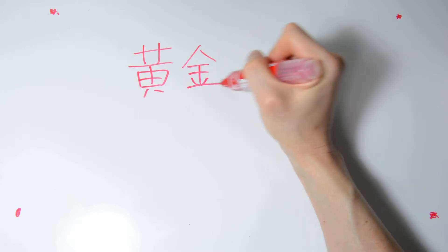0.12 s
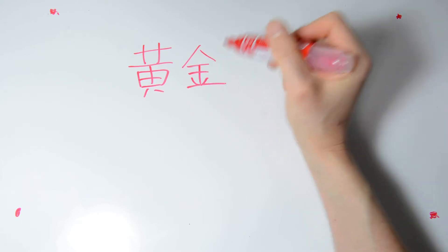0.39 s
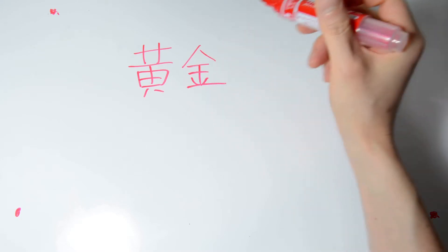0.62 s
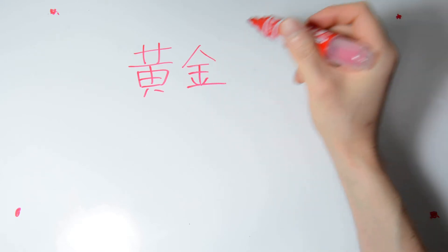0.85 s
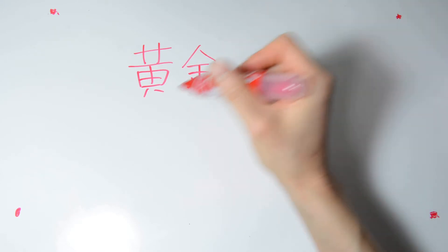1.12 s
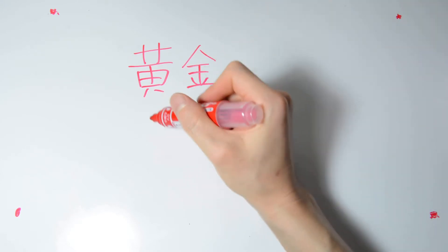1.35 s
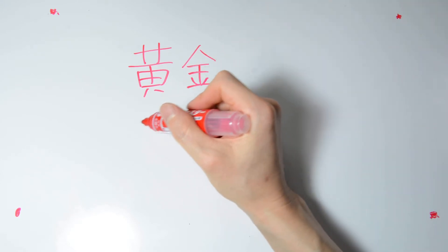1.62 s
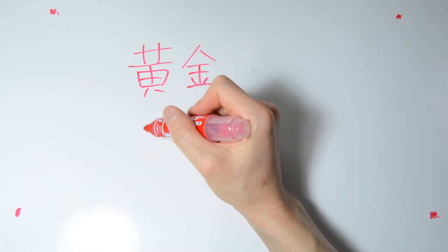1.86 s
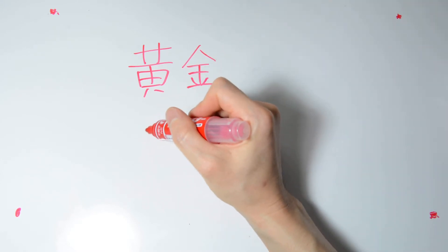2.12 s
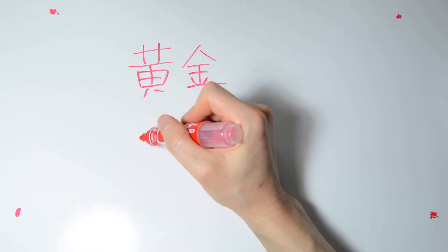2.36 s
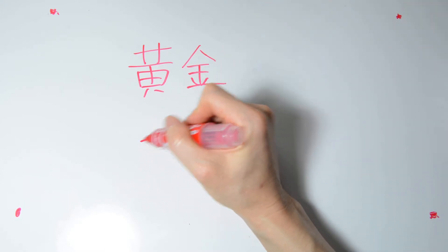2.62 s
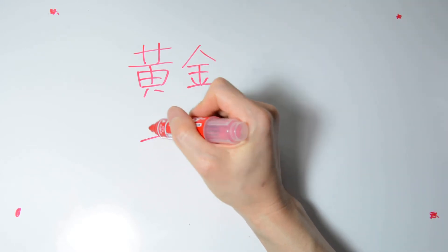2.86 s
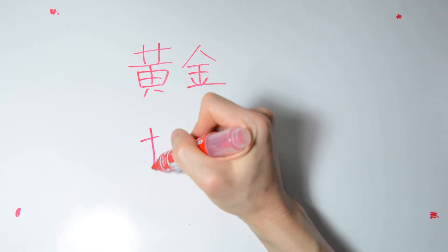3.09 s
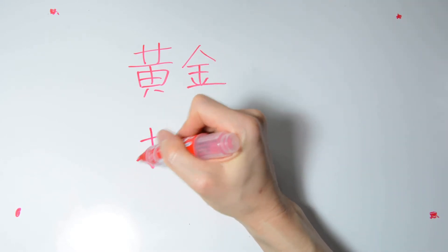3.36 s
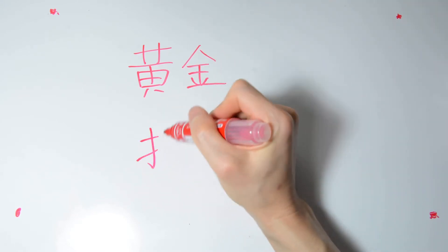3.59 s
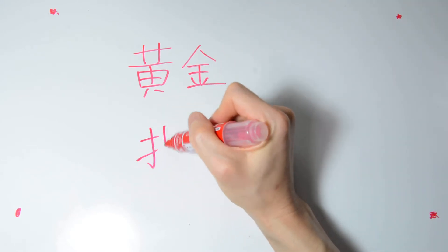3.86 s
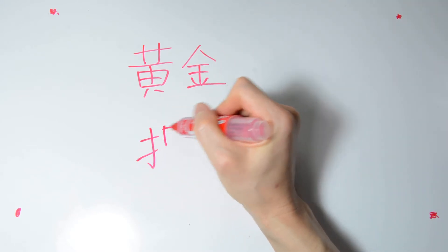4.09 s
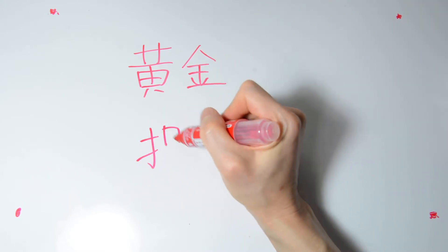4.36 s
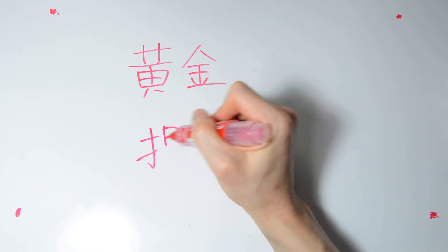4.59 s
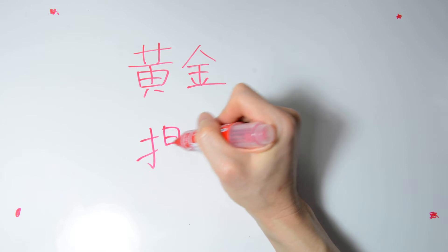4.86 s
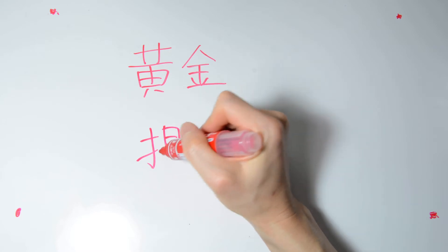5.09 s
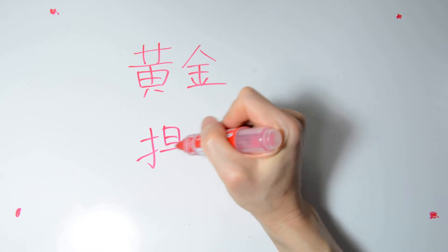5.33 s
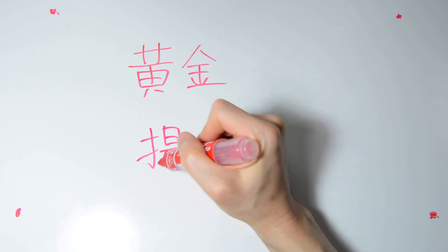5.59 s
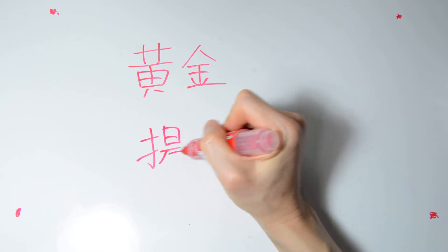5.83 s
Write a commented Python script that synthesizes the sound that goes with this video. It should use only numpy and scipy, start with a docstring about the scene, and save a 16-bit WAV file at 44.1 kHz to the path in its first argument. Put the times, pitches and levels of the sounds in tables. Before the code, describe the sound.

A felt pen finishes a stroke, the hand bumps the board with a stiff rap and heavy low thump, then lifts away, leaving motor and fan hum, mains buzz and soft room noise. After another muffled thump, writing resumes: boomy nib touches several times a second, slight rattles and thin dry hisses, heard closely in stereo indoors.

```python
"""A dull knock, then the soft hiss of a felt marker writing on a large thin whiteboard in a quiet room.
Two close microphone ports hear it. Each hard knock or soft thump sends a bending wave through the board,
treble first and bass last, and its resonances ring. Hard knocks rattle, and strokes add faint hiss and rumble.
One sharp rap and a few dry pen ticks stand out; behind lie hums of a motor and a fan, a mains buzz and room noise."""
import sys
import numpy as np
from scipy import signal
from scipy.fft import rfft, irfft, next_fast_len
from scipy.io import wavfile
from scipy.ndimage import uniform_filter1d

SR = 44100
rng = np.random.default_rng(int(sys.argv[2]) if len(sys.argv) > 2 else 0)


def wav_out(sig):
    """Save sig, one row per channel (or a flat mono array), as 16-bit PCM at SR to the path in sys.argv[1]."""
    wavfile.write(sys.argv[1], SR, np.round(np.clip(np.atleast_2d(sig).T, -1, 1) * 32767).astype(np.int16))


def ratio_of_db(decibels):
    """Turn decibels (scalar or array-like) into linear amplitude factors; 0 dB maps to 1."""
    return 10 ** (np.asarray(decibels, float) / 20)


N = 262836  # length [samples]

# color of the room noise: (frequency [Hz], relative level per Hz [dB])
ROOM_SPECTRUM = [(18, -53), (30, -3.5), (86, -18.5), (135, -9.5), (262, -7.5), (322, -4.5), (414, -9),
                 (624, -10.5), (1030, -13.5), (1260, -9.5), (1450, -14.5), (1950, -14.5), (2340, -20.5),
                 (3080, -23), (7000, -36), (9100, -65), (15400, -120)]
# likeness of the room noise at the two ports: (frequency [Hz], likeness [-1 to 1])
ROOM_LIKENESS = [(60, 0.77), (130, 1), (290, 0.15), (640, 0.86), (1410, 0.77), (3100, 0.68), (6820, 0.37),
                 (15000, 0.02)]
# balance of the room noise: (frequency [Hz], left over right [dB])
ROOM_BALANCE = [(60, 1), (240, -0.5), (950, 2), (3770, 0.5), (15000, 0)]
# color of the microphones' own hiss: (frequency [Hz], relative level per Hz [dB])
MIC_SPECTRUM = [(2000, -12), (5000, -3), (10000, -2), (16000, -5)]
# tones of the motor, as multiples of its base pitch: (multiple)
MOTOR_MULTIPLES = [1, 2, 3, 4, 5, 6, 10, 13, 15, 16, 18]
# level of each motor tone: (left level [dB], right level [dB], lead of the right port [radians])
MOTOR_LEVELS = [(-52.5, -59.5, 0.94), (-64, -64.5, -1.7), (-65, -76, -1.9), (-60, -58, -0.35),
                (-66.5, -67, 0.069), (-66.5, -65, -0.15), (-93, -94, -0.76), (-80, -84, 0.067),
                (-80.5, -87, -0.5), (-84, -82, -0.23), (-96, -96, .8)]
# tones of the mains buzz, as multiples of its base pitch: (multiple)
BUZZ_MULTIPLES = [3, 5, 6, 7, 8, 11, 18, 20, 21, 28, 29, 30, 31, 32, 33, 34, 40]
# level of each buzz tone: (left level [dB], right level [dB], lead of the right port [radians])
BUZZ_LEVELS = [(-92, -101, -5), (-91, -62.5, -2), (-63.5, -74, -1.05), (-76.5, -89, 0), (-72, -66, -0.3),
               (-82, -70.5, 0), (-79, -84, -0.6), (-78, -81.5, -0.5), (-79, -85, 3), (-86, -81, -2),
               (-77, -71, 1.5), (-74, -73, 1), (-72.5, -77.5, 1.06), (-74.5, -75.5, 0), (-84, -77, 0),
               (-82, -76.5, 2.5), (-80, -78.5, 1.5)]
# tones of the fan, as multiples of its base pitch: (multiple)
FAN_MULTIPLES = [1, 1.6]
# level of each fan tone: (left level [dB], right level [dB], lead of the right port [radians])
FAN_LEVELS = [(-62.5, -64, -0.91), (-63, -68.5, 1.3)]
# ticks of the pen barrel: (time [s], level [dB], pitch [Hz])
PEN_TICKS = [(0.563, -42.5, 4530), (3.258, -51.5, 6950), (3.788, -51, 4540)]
# strokes of the nib: (middle [s], length [s], level [dB])
STROKES = [(0.095, 0.24, -63), (0.267, 0.043, -61.5), (.52, 0.15, -66.5), (2.688, 0.22, -66),
           (3.01, 0.09, -61), (3.085, 0.16, -63.5), (3.395, 0.054, -65), (3.472, 0.2, -67),
           (3.82, .11, -62), (4.103, 0.15, -66), (4.266, 0.11, -65.5), (4.64, .1, -65.5),
           (4.874, 0.096, -66), (4.98, .12, -71), (5.224, 0.13, -63.5), (5.55, 0.16, -64),
           (5.83, 0.18, -65), (5.95, .06, -63.5)]
# color of the felt's hiss: (frequency [Hz], relative level per Hz [dB])
FELT_SPECTRUM = [(1500, -11), (3500, 3), (5000, 3), (7000, -4), (10500, -3.5), (12500, -5.5),
                 (16000, -16.5)]
# edges of the band of close high modes heard as a rattle: (frequency [Hz])
RATTLE_BAND = [500, 950]
# harder knocks on the board, mostly the nib, a few the firm front of a hand thud:
# (time [s], force [dB], hardness: the blow is cushioned above this [Hz])
HARD_KNOCKS = [(-.0422, 5.5, 121), (0.4318, -14.5, 239), (0.4821, -16, 260), (1.562, -12, 230),
               (2.5382, -9.5, 272), (2.8805, -3, 210), (3.3263, -0.5, 313), (3.76, -0.9, 350),
               (4.0105, .1, 225), (4.551, -3.2, 196), (4.7998, .6, 236), (5.1335, -2.7, 224),
               (5.4746, 0.5, 278), (5.7518, -2.9, 313)]
# soft low thumps, alone or filling out the bass of a nib landing:
# (time [s], force [dB], share that rocks the panel, with or against the push [factor])
SOFT_THUMPS = [(-.005, -4, 0.7), (0.0305, -14, 0.2), (0.204, -16, -.75), (0.4915, 11.5, 0.12),
               (0.5514, -14, -2.5), (1.554, -1.5, -1), (1.983, -15, 0.1), (2.6186, -5.5, 0.45),
               (2.9287, -4.5, -.15), (3.0254, -15, -.4), (3.2, -17, -0.2), (3.364, -4, 0.9),
               (3.8264, -7.5, 0.4), (3.906, -13, -1), (4.091, -13, 0.1), (4.344, -8, 0.6),
               (4.5879, -4, 1.1), (4.7, -12, -0.2), (4.8196, -4, -.1), (4.865, -7, 0.4), (4.936, -14, -0.4),
               (5.273, -14.5, 0.8), (5.53, -11, 1.8), (5.614, -5.3, .45), (5.7746, -4, 0.9)]
# weight of the hand resting on the board, a faint rumble: (time [s], force [dB])
HAND_WEIGHT = [(0, -69), (.58, -56), (.85, -73), (1.4, -74), (1.66, -63), (1.97, -71), (2.5, -67),
               (3.4, -63), (5.96, -60.5)]
# resonances (modes) of the board, swings of opposite sign being opposite sides of a still line:
# (frequency [Hz], time to fade by 60 dB [s], swing at left port [factor], swing at right port [factor])
BOARD_MODES = [(44.0, 0.151, 0.022, -0.019), (59.4, 0.072, -0.28, -0.081), (70.8, 0.131, 0.099, 0.18),
               (80.3, 0.071, 0.346, -0.114), (104.0, 0.112, -0.152, -0.098), (120.8, 0.152, 0.058, -0.055),
               (122.7, 0.056, -0.074, 0.262), (148.9, 0.167, 0.027, -0.04), (174.7, 0.142, 0.036, -0.056),
               (198.8, 0.136, 0.05, -0.022), (193.8, 0.184, -0.014, 0.092), (211.5, 0.098, 0.004, -0.047),
               (286.4, 0.066, 0.076, 0.041), (303.4, 0.02, -0.191, -0.068), (362.6, 0.11, -0.047, 0.07),
               (372.4, 0.051, 0.108, -0.093), (481.3, 0.143, -0.004, -0.043),
               (534.7, 0.087, -0.025, -0.018), (643.0, 0.32, -0.002, 0.009), (741.1, 0.069, 0.002, -0.031),
               (779.6, 0.386, -0.006, -0.003), (878.4, 0.142, 0.016, 0.031), (949.3, 0.033, -0.022, -0.041)]
# the whole panel rocking:
# (frequency [Hz], time to fade by 60 dB [s], swing at left port [factor], swing at right port [factor])
ROCKING_MODES = [(56, .4, .1, .08)]
# something stiffer than the writing face, perhaps the frame:
# (frequency [Hz], time to fade by 60 dB [s], swing at left port [factor], swing at right port [factor])
RAP_MODES = [(111, 0.13, -0.023, 0.016), (147.6, 0.19, -0.015, -0.04), (238.5, 0.09, 0.004, 0.038),
             (388, 0.039, 0.016, 0.021), (544, 0.021, 0.022, 0.0085), (720, 0.092, 0.000081, -0.011),
             (834, 0.022, -0.013, -0.027)]
# way from the board to the ports: (frequency [Hz], gain [dB])
PATH_GAIN = [(30, -2), (50, 3.5), (100, 0), (160, 2.5), (250, 2.5), (500, 0.5), (1000, -5)]


def evened(x):
    """Scales a signal to rms 1, its average strength."""
    return x / np.sqrt(np.mean(x ** 2) + 1e-20)


def read(points, hz):
    """Reads a spectrum between its points, on a logarithmic frequency axis."""
    f, value = np.transpose(points)
    return np.interp(np.log(hz + 1), np.log(f + 1), value)


def along(rows):
    """Reads a curve over time at every sample."""
    return np.interp(np.arange(N) / SR, *np.transpose(rows))


def drift(low_hz, top_hz):
    """Chance wavering of rms 1: a sum of slow sines, the slower ones stronger."""
    t = np.arange(0, N + 64, 64) / SR  # every 64th sample is enough
    rates = np.geomspace(low_hz, top_hz, num=24)
    waves = [np.sin(2 * np.pi * (f * t + rng.random())) / np.sqrt(f) for f in rates]
    return np.interp(np.arange(N) / SR, t, evened(sum(waves)))


def hiss(spectrum, likeness, balance_db, patchy_db, size):
    """Two-port noise from random short-time spectra, louder and softer in drifting patches."""
    hz = np.fft.rfftfreq(size, 1 / SR)[:, None]
    a, b, c, d, patches = rng.standard_normal((4 * N // size + 5, len(hz), 5)).T
    patches = uniform_filter1d(patches, size=12, axis=0)  # smooth over frequency
    patches = evened(uniform_filter1d(patches, size=10, axis=1))  # smooth over time
    same = np.clip(read(likeness, hz), -1, 1)
    left = a + 1j * b
    right = same * left + np.sqrt(1 - same ** 2) * (c + 1j * d)
    tilt = ratio_of_db(balance_db(hz) / 2)
    z = np.array([left * tilt, right / tilt])
    z *= ratio_of_db(read(spectrum, hz) + patchy_db * patches)
    noise = signal.istft(z, nperseg=size, noverlap=3 * size // 4)[1]
    return evened(noise[:, :N])


def port_hiss():
    """Each port's own faint noise, almost unrelated to the other's."""
    likeness = [(1000, 0.0041), (16000, 0.0047)]
    return ratio_of_db(-68) * hiss(MIC_SPECTRUM, likeness, np.zeros_like, .3, size=1024)


def room_noise():
    """Room noise, mostly low, alike at the ports to a degree that varies with pitch, least in the high treble."""
    return ratio_of_db(-51.5) * hiss(ROOM_SPECTRUM, ROOM_LIKENESS, lambda hz: read(ROOM_BALANCE, hz), 0.88, size=2048)


def tones(base_hz, multiples, levels, wander, waver_db):
    """Multiples of one slightly wandering speed, each wavering in level."""
    turns = np.cumsum(base_hz * (1 + wander * drift(.3, 8.08))) / SR
    out = np.zeros((2, N))
    for k, (left_db, right_db, lead) in zip(multiples, levels):
        phase = 2 * np.pi * (k * turns + rng.random()) + np.array([[0], [lead]])
        level_db = [[left_db], [right_db]] + waver_db * drift(1.5, 25)
        out += np.sqrt(2) * ratio_of_db(level_db) * np.sin(phase)  # root 2 makes the levels rms
    return out


def hum():
    """Motor, mains and fan each sound a set of tones on their own base pitch."""
    motor = tones(322.15, MOTOR_MULTIPLES, MOTOR_LEVELS, 0.00052, 0.78)
    mains = tones(100.02, BUZZ_MULTIPLES, BUZZ_LEVELS, .0001, 0.87)
    fan = tones(92.3, FAN_MULTIPLES, FAN_LEVELS, 0.011, 1.7)
    return motor + mains + fan


def ticks():
    """Short dry clicks of plastic that swell and fade within a few cycles."""
    tick_s = 0.0015  # length of one tick
    out, t = np.zeros(N), np.arange(600) / SR
    for s, db, hz in PEN_TICKS:
        swell = np.sin(np.pi * np.minimum(t / tick_s, 1)) ** 2
        out[round(s * SR):][:600] += ratio_of_db(db) * swell * np.sin(2 * np.pi * hz * t)
    return out


def strokes(stretch):
    """Each stroke speeds up and slows down, so its strength rises and falls in a bell shape."""
    t = np.arange(N) / SR
    return sum(ratio_of_db(db) * np.exp(-8 * ((t - s) / (stretch * length)) ** 2) for s, length, db in STROKES)


def felt():
    """Fibres scrape in small uneven grains while the nib slides."""
    grain = evened(uniform_filter1d(rng.standard_normal(N), size=40))
    rub = hiss(FELT_SPECTRUM, [(1000, 0.96), (16000, 0.17)], np.zeros_like, 1.8, size=256)
    uneven = ratio_of_db(1.7 * grain + 1.3 * drift(18, 90))
    return strokes(1) * evened(uneven * rub)


def cracks():
    """Each hard knock shakes many close high modes, a short rattle that grows with force and hardness."""
    lag_s, rise_s, fade_s = .014, 0.0084, 0.079  # fade is the time to fall by 60 dB
    out, t = np.zeros((2, N + SR)), np.arange(4000) / SR
    shape = np.minimum(t / rise_s, 1) * ratio_of_db(-60 * t / fade_s)
    band = signal.butter(4, RATTLE_BAND, "band", fs=SR, output="sos")
    noises = rng.standard_normal((len(HARD_KNOCKS), 2, len(t)))
    for (s, db, hard_hz), (a, b) in zip(HARD_KNOCKS, noises):
        rattle = signal.sosfilt(band, shape * np.array([a, 0.44 * a + 0.71 * b]))
        rattle /= np.abs(rattle).max()
        at = round((s + lag_s) * SR) + SR // 2  # half a second of room for times below zero
        out[:, at:at + len(t)] += ratio_of_db(db - 39) * hard_hz / 250 * rattle
    return out[:, SR // 2:][:, :N]


def ringing(modes, size):
    """Spectrum at both ports of a set of modes, each a sine that dies away."""
    t = np.arange(SR // 2) / SR
    ring = sum(np.outer(swing, ratio_of_db(-60 * t / fade_s) * np.sin(2 * np.pi * f * t))
               for f, fade_s, *swing in modes)
    return rfft(ring, size)[:, :size // 16]


def walls(size):
    """Spectrum of a short diffuse echo tail, different at each port and weak in the bass."""
    fade_s, bass_hz = 0.11, 136  # time to fall by 60 dB; echoes are weak under this frequency
    t = np.arange(SR // 2) / SR
    tail = rng.standard_normal((2, len(t))) * ratio_of_db(-60 * t / fade_s) * (t > .004)
    hz = np.fft.rfftfreq(size, 1 / SR)[:size // 16]
    echo = rfft(tail / np.linalg.norm(tail[0]), size)[:, :len(hz)]
    return echo * ratio_of_db(-3) * hz ** 2 / (hz ** 2 + bass_hz ** 2)


def knocks(hz):
    """Hard knocks and soft thumps: their total push on the board, and the part that rocks the panel."""
    # bending waves lag by this many radians times the root of the frequency in Hz
    lag = 2.64 * np.sqrt(hz)
    high = hz ** 2 / (hz ** 2 + 350 ** 2)
    # time, force, hardness [Hz], no push under this [Hz], factor on the lag, share that rocks the panel
    blows = [(s, db, hard_hz, 21.6, 1.02, 0.16) for s, db, hard_hz in HARD_KNOCKS]
    blows += [(s, db, 50, 21, 0.794, share) for s, db, share in SOFT_THUMPS]
    spots = rng.random((len(blows), 2))
    force, rock = 0, 0
    for (s, db, hard_hz, rebound_hz, distance, share), (turn, step) in zip(blows, spots):
        blow = ratio_of_db(db) * 1j * hz / (1j * hz + rebound_hz) / (1 + 1j * hz / hard_hz) ** 2
        # each spot on the board favours other high modes, by up to 3 dB
        blow *= ratio_of_db(3 * high * np.sin(2 * np.pi * turn + (.5 + step) * np.sqrt(hz)))
        blow *= np.exp(-1j * (2 * np.pi * hz * s + distance * lag))  # place in time
        force, rock = force + blow, rock + share * blow
    return force, rock


def drag(size, hz):
    """Resting hand and sliding nib push roughly on the board, a low rumble that catches and lets go."""
    strength = ratio_of_db(along(HAND_WEIGHT)) + ratio_of_db(5) * strokes(0.97)
    slips = rng.standard_normal(N) * strength
    slips *= ratio_of_db(2 * drift(4.5, 16))
    return rfft(slips, size)[:len(hz)] / (1 + 1j * hz / 120) ** 2


def board():
    """Knocks, thumps and a rough drag make the board's modes ring; one rap and short echoes join them."""
    size = next_fast_len(N + SR)
    hz = np.fft.rfftfreq(size, 1 / SR)[:size // 16]  # the bottom eighth of the spectrum
    force, rock = knocks(hz)
    force = force + drag(size, hz)
    rap = ringing(RAP_MODES, size) * np.exp(-2j * np.pi * hz * .4385)  # at .4385 s
    shaken = ringing(BOARD_MODES, size) * force + ringing(ROCKING_MODES, size) * rock
    near = ratio_of_db(read(PATH_GAIN, hz)) * shaken + rap
    echoes = walls(size) * near[::-1]  # each port's echoes come from the other port's sound
    return irfft(near + echoes, size)[:, :N]


def scene():
    """Room, pen and board together."""
    return room_noise() + hum() + ticks() + felt() + cracks() + board()


def band_limit(x):
    """A steep low-pass at the top of the band."""
    return signal.sosfilt(signal.butter(12, 16400, fs=SR, output="sos"), x)


def record(dry):
    """Each port adds its own hiss; then the deep bass and the highest treble are cut."""
    noisy = dry + port_hiss()
    bass_cut = signal.butter(3, 33, "high", fs=SR, output="sos")
    noisy = signal.sosfiltfilt(bass_cut, noisy)
    treble_cut = signal.firwin(1023, 15740, window=("kaiser", 9), fs=SR)
    mix = signal.oaconvolve(noisy, treble_cut[None], "same")
    return band_limit(mix)


dry = scene()
out = record(dry)
wav_out(out)
```